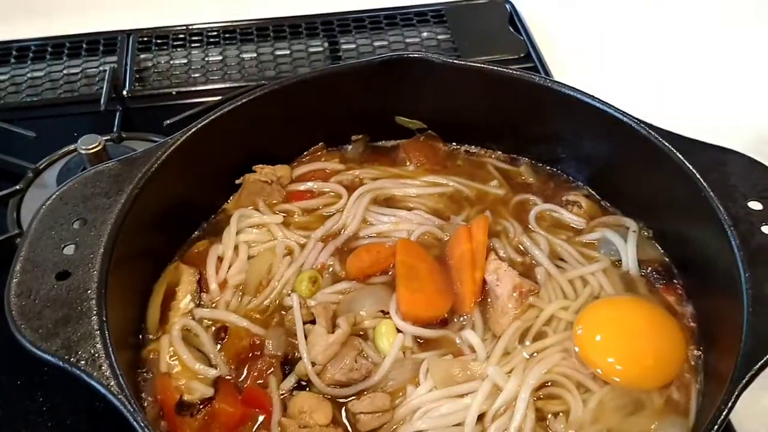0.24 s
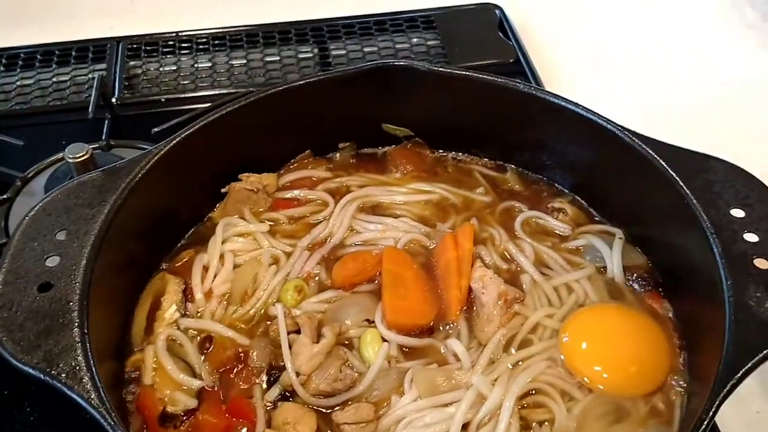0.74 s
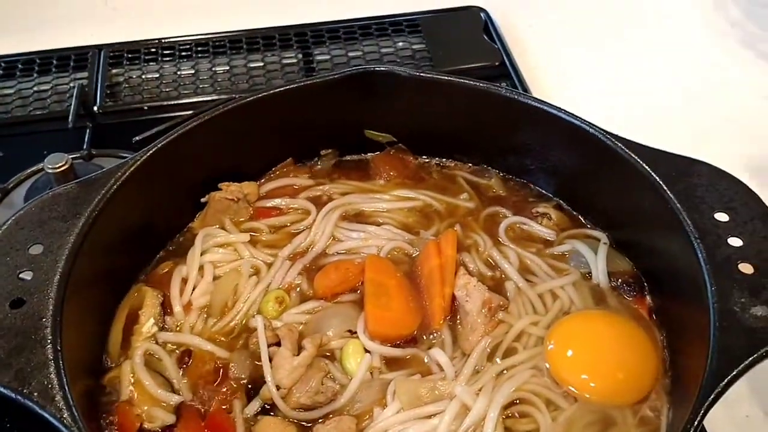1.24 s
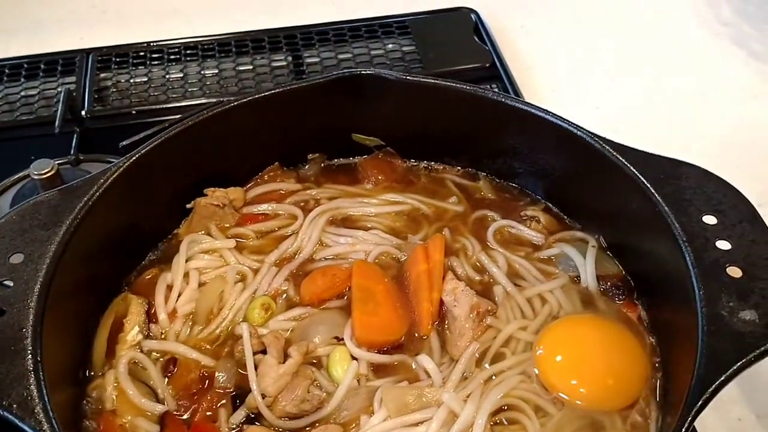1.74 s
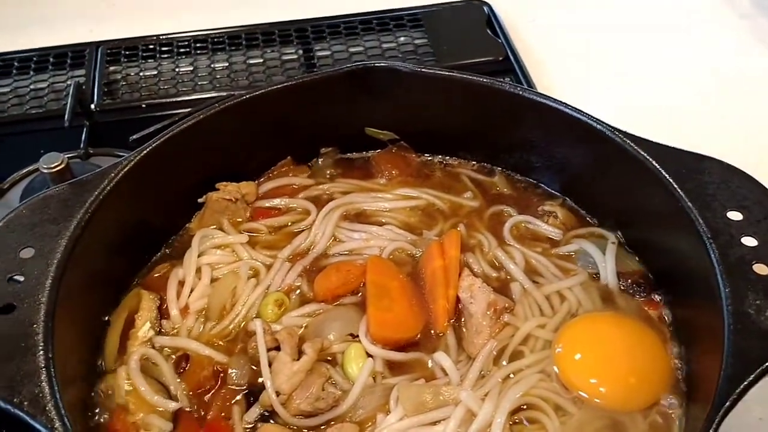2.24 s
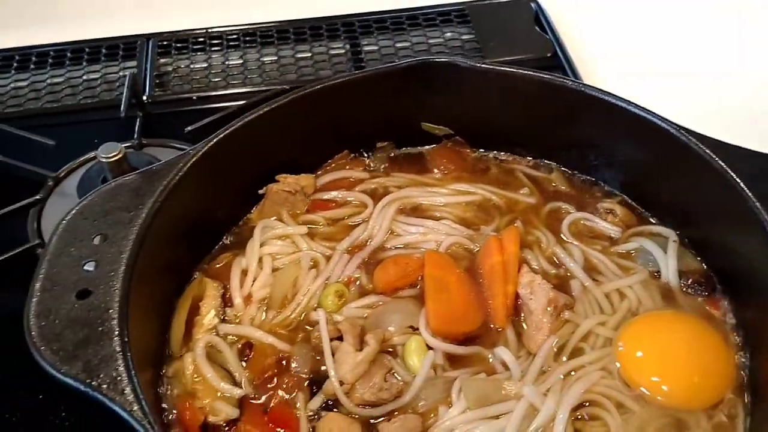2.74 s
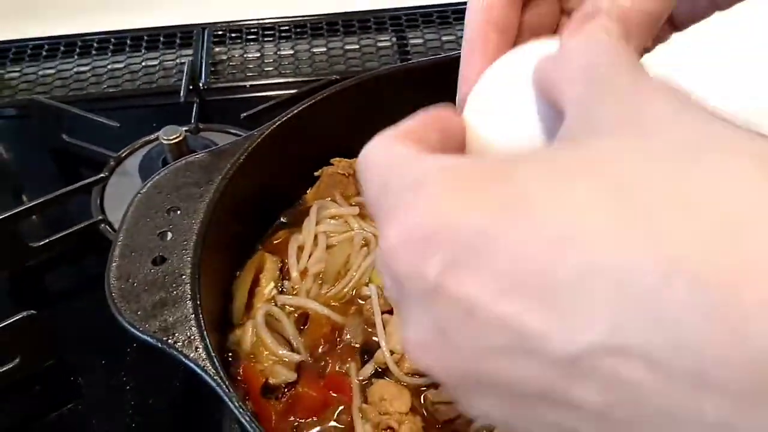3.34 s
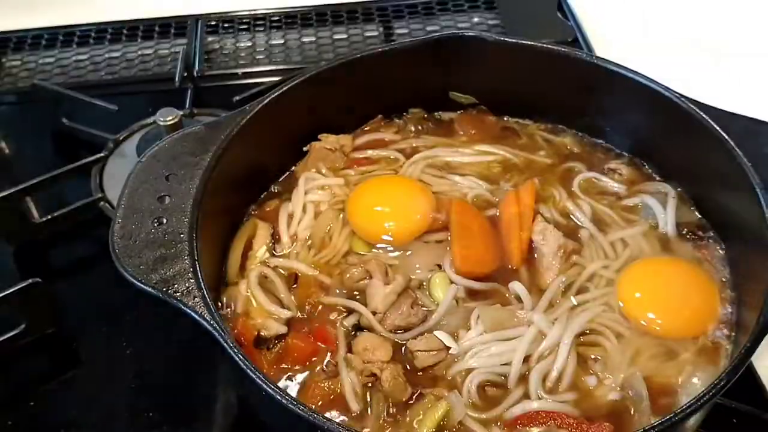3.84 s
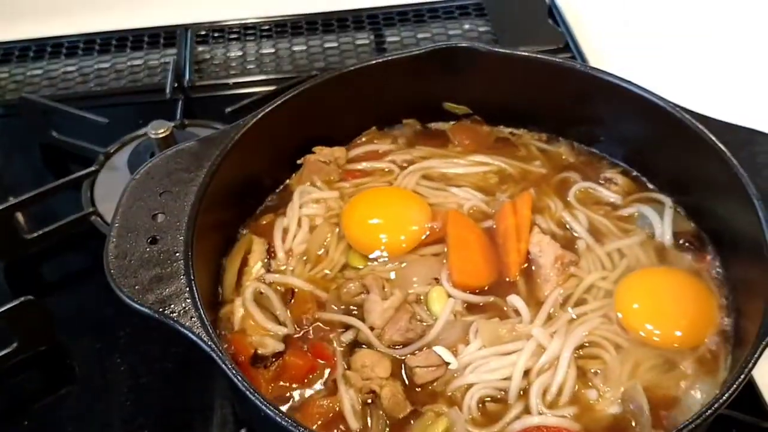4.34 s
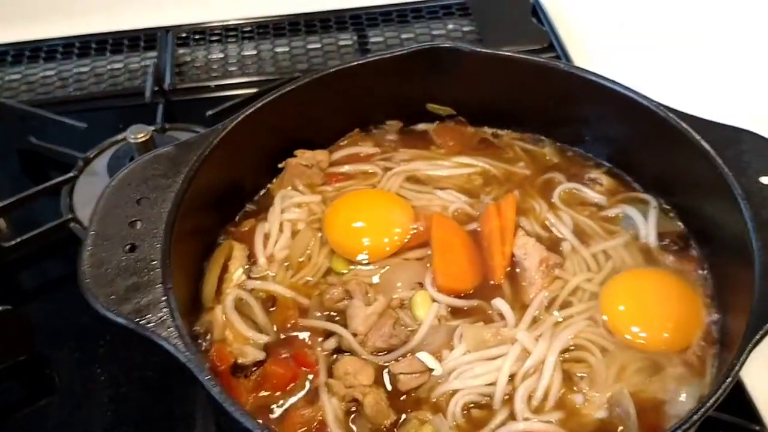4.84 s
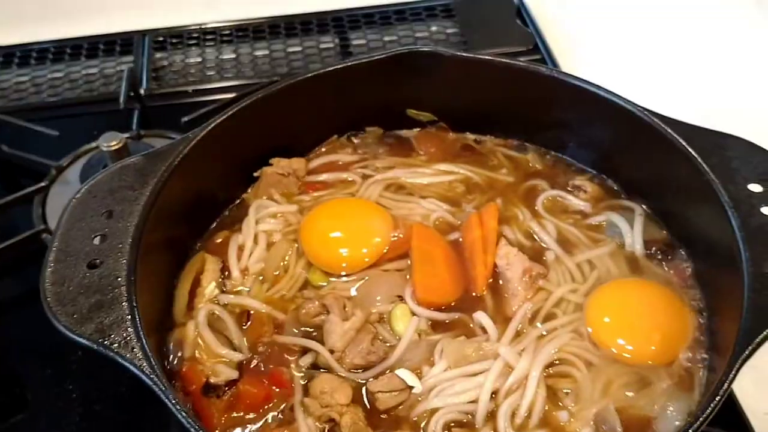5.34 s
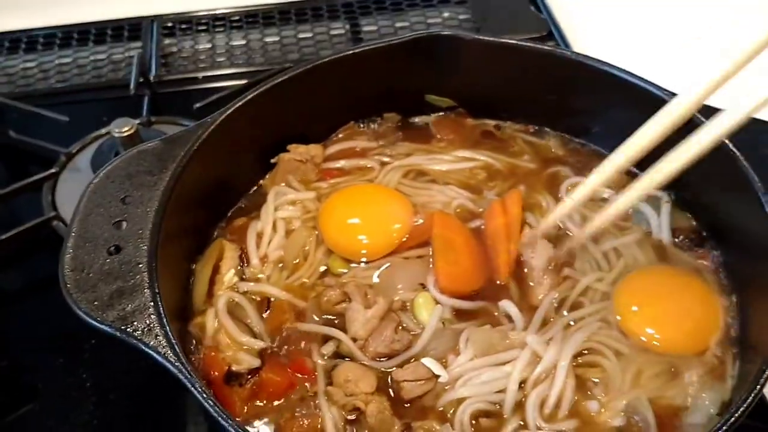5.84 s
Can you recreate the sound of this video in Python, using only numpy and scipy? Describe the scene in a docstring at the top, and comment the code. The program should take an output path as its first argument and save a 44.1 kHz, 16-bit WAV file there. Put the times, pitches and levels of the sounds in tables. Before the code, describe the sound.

Soft bubbling and fine fizzing of a hot pot, with an egg's sharp rap and crunch between two clinks of shell dropped in a bowl.

```python
"""Throughout, noodle broth simmers in an iron pot on a gas burner: decaying sines that rise in pitch
for the bubbles, tiny high ticks for the fizz, coloured noise for the rush of the boil.
At 0.7 s eggshells drop into a china bowl: coloured clicks and noise bursts over decaying bowl modes.
At 1.4 and 1.7 s an egg is knocked on the counter and cracks: knock, thud and crunch noise bursts.
At 4.4 s its shell lands in the bowl too. A small kitchen adds its noise-tail reverberation."""
import sys
import numpy as np
from scipy import signal
from scipy.fft import rfft, irfft, next_fast_len
from scipy.io import wavfile

SR = 44100
rng = np.random.default_rng(int(sys.argv[2]) if len(sys.argv) > 2 else 0)


def inscribe(sig):
    """Save sig as 16-bit PCM at rate SR to the path in sys.argv[1].

    A 1-D sig is mono; a 2-D sig holds one channel per row.
    Samples are clipped to [-1, 1] before scaling.
    """
    pcm = np.round(np.clip(np.atleast_2d(sig).T, -1, 1) * 32767)
    wavfile.write(sys.argv[1], SR, pcm.astype(np.int16))


N = 269010

# Drives are amplitudes ahead of group gain, colour and room; pitches are at the onset of the glide.
# Large bubbles: (time [s], drive [dB], pitch [Hz])
LARGE_POPS = [(0.5102, -38.5, 2080), (1.1947, -38, 1510), (1.6462, -38.5, 2160), (2.3111, -46, 2080),
              (2.588, -32.5, 1980), (2.9399, -40.5, 1560), (3.8671, -41, 1210), (4.3186, -37.5, 1540),
              (4.6733, -34.5, 1300), (4.9721, -36, 1620), (5.2016, -41, 1860), (5.252, -37, 1380),
              (5.6136, -40, 1910), (6.0671, -35.5, 1580)]
# Droplets spitting on the hot wall: (time [s], drive [dB], pitch [Hz])
WALL_SPITS = [(0.3364, -34, 13600), (2.2805, -38, 6260), (2.373, -38, 4770), (4.6294, -34.5, 4650)]
# Steam gulping under the noodles: (time [s], drive [dB], pitch [Hz])
STEAM_GULPS = [(1.055, -40.5, 390), (1.08, -39.5, 498)]
# Stray pops and spits: (rate [1/s], drive [dB], drive spread [+-dB], pitch [Hz], half of pitch spread [+-octaves])
STRAY_POP_STATS = (3.5, -43.5, 1.5, 1607, 0.43)
STRAY_SPIT_STATS = (1, -43, 9, 8000, .5)
# Shell landings: (time [s], first contact level [dB], tilt above 1 kHz [dB/octave], hollow [Hz],
# first bounce gap [s], ring drive [dB], place [0 bottom - 1 rim], contact left minus right [dB])
SHELL_LANDINGS = [(0.737, -28, 6, 1280, .005, -37.5, 0.2, -11), (0.7416, -30, 2, 1720, 0.0019, -46, .3, 2),
                  (0.7835, -30.5, -2, 1156, .0058, -40, 0.2, -3.5),
                  (4.3664, -22.5, 2.5, 840, .0114, -25, 1, 3.5), (4.393, -26, 0, 1020, .028, -46, 0.61, 13)]
# Egg contacts: (time [s], knock level [dB], thud drive [dB], crunch level [dB], knock left minus right [dB])
EGG_KNOCKS = [(1.4425, -23.5, -36, -42, 16), (1.4445, -17, -33.5, -30, 13.5), (1.6986, -45, -42, -26, -1),
              (1.7018, -32, -27, -29, 6.5)]
# China bowl modes: (frequency [Hz], t60 [s], gain struck at bottom [dB], gain struck at rim [dB])
BOWL_MODES = [(1096, 0.16, 10, -17), (1210, 0.31, 5.5, -29), (1250, 0.13, 7, -3), (1790, 0.17, -1, -26),
              (2714, .52, -5, -8.5), (2742, .4, -12, -22), (2820, .12, -13, -29), (3472, .1, -30, -27),
              (3820, 0.13, -26, -12), (4480, 0.49, -29, -24), (4737, 0.34, -36, -10), (6170, 0.065, 8, -21),
              (6664, 0.15, -25, -4), (7300, 0.075, -26, -3), (8900, .1, -9, -39)]
# Resonances of the air above the broth: (frequency [Hz], width [Hz], lift or dip [dB])
POT_AIR_MODES = [(300, 5.8, 5), (349.3, 5.8, 6.5), (610, 41, 5.5), (489, 29, 0.5), (715.6, 82, 9.5),
                 (766, 17.5, 5.5), (837, 34, 4.5), (1004, 5.6, -3), (1220, 41, 2)]
# Relative noise and tick spectra: (frequency [Hz], gain [dB])
SHELL_COLOUR = [(60, -37), (200, -33), (330, -18), (600, -14.5), (1000, -7), (1450, -5.5), (1750, -5.5),
                (2250, -11.5), (2800, -3), (3700, -10.5), (5500, -12.5), (9000, -16), (15000, -20.5)]
COUNTER_COLOUR = [(50, -29), (150, -40), (290, -3.5), (450, -5), (620, 0.5), (840, 1.5), (1100, -6),
                  (1600, -7.5), (2100, -0.5), (2700, -0.5), (3400, -8), (6000, -12.5), (10000, -21.5),
                  (16000, -23)]
THUD_COLOUR = [(40, -27), (100, -31), (150, -3), (195, -8), (310, 5.5), (550, 4), (800, -2.5), (1200, -6.5),
               (4000, -22), (16000, -41)]
CRUNCH_COLOUR = [(150, -20.5), (1100, -22), (1600, 2.5), (2500, -3), (3500, -4.5), (6000, -10), (9500, -7),
                 (12000, -11), (16000, -11)]
BOIL_COLOUR = [(25, -47), (60, -26), (100, -20.5), (155, -11.5), (255, -17.5), (335, -4.5), (520, -4),
               (720, -7), (950, -7.5), (2000, -13), (3400, -17), (6000, -19.5), (8500, -25.5),
               (11500, -22.5), (15500, -39)]
FIZZ_COLOUR = [(300, -19), (1500, 6), (3000, -6.5), (5000, -3.5), (9000, 1.5), (11500, 0), (15500, 3.5)]
# Responses of pot mouth, hot wall and the two microphones: (frequency [Hz], gain [dB])
POT_MOUTH_RESPONSE = [(40, -55), (150, -23), (260, -13), (350, 3), (700, 0), (2400, 4.5), (4000, 1),
                      (15000, -29)]
WALL_RESPONSE = [(60, -40), (800, -18), (2500, 3.5), (16000, 2.5)]
LEFT_MIC_RESPONSE = [(7000, 0), (9500, 1.5), (11000, -2.5), (16000, -0.5)]
RIGHT_MIC_RESPONSE = [(6000, 0.41), (8500, 1.6), (11000, 0.67), (15000, 2.7)]
# Kitchen reverberation: (frequency [Hz], t60 [s])
KITCHEN_T60 = [(130, 0.71), (350, 0.35), (1000, 0.44), (3000, 0.32), (7000, 0.4), (15000, 0.26)]

# Each bounce comes sooner, weaker and duller than the contact before it.
BOUNCE_GAP_RATIO, BOUNCE_LOSS_DB, BOUNCE_TILT_DB_PER_OCT = 0.76, -6, -1.5
MIC_GAP_S = 0.000341  # sound travel time between the microphones
TOP_HZ = 16000
T = np.arange(SR // 2) / SR  # time axis of a blow [s]


def simmer(cluster_rate_hz=120, pitch_hz=1500, octaves=0.55, cycles=8, crowd_db=-59.0):
    """Bubbles burst in clusters; large pops set off neighbours; steam gulps; the pot's air colours all."""
    crowd, large = np.zeros((2, N)), np.zeros((2, N))
    large_cycles, pop_gain_db, neighbour_db, cluster_s = 10, 3.5, -9, 0.014

    for s, db, hz in list(LARGE_POPS) + strays(*STRAY_POP_STATS):
        pan_db = 2.0 + 2 * rng.standard_normal()
        add(large, s, undb(db + pop_gain_db) * bubble(hz, large_cycles, pan_db))
        for delay, shift in rng.random((4, 2)):
            neighbour = bubble(hz * 2 ** (1.3 * shift - 0.5), large_cycles, pan_db)
            add(large, s + cluster_s * delay ** 2, undb(db + neighbour_db) * neighbour)

    for s, db, hz in STEAM_GULPS:
        add(large, s, undb(db) * bubble(hz, large_cycles, pan_db=2.1))

    for s in rng.uniform(0, N / SR, int(cluster_rate_hz * N / SR)):
        force, place = rng.uniform(-1.12, 1, 2)
        for size in np.clip(rng.standard_normal(3), -2, 2):
            small = bubble(pitch_hz * 2 ** (octaves * size), cycles, 6 * place)
            add(crowd, s + cluster_s * rng.random(), undb(4.2 * force) * small)

    bursts = kitchen(level(crowd, crowd_db), wet_db=-2.5) + kitchen(large, wet_db=-4)
    return colour(bursts, POT_MOUTH_RESPONSE, peaks=POT_AIR_MODES)


def fizz(tick_rate_hz=560, spread_db=5, sizzle_db=-59.0, cycles=8, echo_db=-4, echo_max_s=0.0035):
    """Tiny bubbles snap on the hot wall, each echoed by the far side of the pot; droplets spit in bursts."""
    ticks, spits = np.zeros((2, N)), np.zeros((2, N))
    spit_pan_db, spit_burst_s = -2, 0.005

    for s, db, hz in list(WALL_SPITS) + strays(*STRAY_SPIT_STATS):
        add(spits, s, undb(db) * bubble(hz, cycles, spit_pan_db, size=256))
        for delay, shift in rng.random((8, 2)):
            droplet_hz = min(hz * 2 ** (2.0 * shift - 0.7), 14000)
            droplet = bubble(droplet_hz, cycles, spit_pan_db, size=256)
            add(spits, s + spit_burst_s * delay, undb(db - 2) * droplet)

    for when, pitch, force, place, path in rng.random((int(tick_rate_hz * N / SR), 5)):
        s = when * N / SR
        # most ticks are faint, a few are sharp
        tick_gain = undb(-spread_db * np.log(0.0087 + force))
        tick = tick_gain * bubble(2800 + 12500 * pitch, cycles, 14 * (place - 0.5), size=256)
        add(ticks, s, tick)
        add(ticks, s + echo_max_s * path, undb(echo_db) * tick[::-1])  # echo swaps sides

    flicker = undb(1.25 * walk(30))
    sizzle = level(colour(ticks, FIZZ_COLOUR) * flicker, sizzle_db)
    return kitchen(sizzle + colour(spits, WALL_RESPONSE), wet_db=-3.0)


def shells(shell_t60_s=0.055, hollow_width_hz=220, hollow_lift_db=9, contacts=3):
    """Hollow shell halves land and bounce; the landing sets the bowl's modes ringing."""
    clacks, rings = np.zeros((2, N)), np.zeros((2, N))
    for s, db, tilt_db, hollow_hz, gap_s, ring_db, place, pan_db in SHELL_LANDINGS:
        touch_s = s
        hollow = [(hollow_hz, hollow_width_hz, hollow_lift_db)]
        for k in range(contacts):
            raw = contact(shell_t60_s, grain_db=6.5)
            clack = colour(raw, SHELL_COLOUR, tilt_db + k * BOUNCE_TILT_DB_PER_OCT, hollow)
            add(clacks, touch_s, blow_level(clack, db + k * BOUNCE_LOSS_DB) * sides(pan_db))
            touch_s += gap_s * BOUNCE_GAP_RATIO ** k
        for hz, t60_s, bottom_db, rim_db in BOWL_MODES:
            # each mode reaches the two microphones at its own phase
            phase = rng.uniform(0, 2 * np.pi) + rng.uniform(-0.9, 0.9, (2, 1))
            # a harder contact feeds the higher modes
            hardness_db = tilt_db * np.log2(hz / 2700)
            place_db = np.interp(place, [0, 1], [bottom_db, rim_db])
            mode = fade(t60_s) * np.sin(2 * np.pi * hz * T + phase)
            add(rings, s, undb(ring_db + hardness_db + place_db) * mode * sides(pan_db / 2))
    return kitchen(clacks, wet_db=-5.5) + kitchen(rings, wet_db=-14.0)


def egg(knock_t60_s=0.051, thud_t60_s=0.034, crunch_t60_s=0.033):
    """The egg raps the counter; its shell crunches as it gives way and the counter booms softly."""
    raps, booms = np.zeros((2, N)), np.zeros((2, N))
    for s, knock_db, thud_db, crunch_db, pan_db in EGG_KNOCKS:
        knock = colour(contact(knock_t60_s, grain_db=7.0), COUNTER_COLOUR)
        crunch = colour(contact(crunch_t60_s, grain_db=0.5), CRUNCH_COLOUR)
        thud = colour(contact(thud_t60_s, grain_db=2.5), THUD_COLOUR)
        add(raps, s, blow_level(knock, knock_db) * sides(pan_db))
        add(raps, s, blow_level(crunch, crunch_db) * sides(pan_db + 0.5))
        add(booms, s, blow_level(thud, thud_db - 1.5) * sides(pan_db))
    return kitchen(raps, wet_db=-7.5) + kitchen(booms, wet_db=-3.0, build_s=0.0027)


def boil(rush_db=-55):
    """Flame and boiling at the bottom merge into a rush that rings the air in the pot."""
    rush = colour(diffuse(N), BOIL_COLOUR, peaks=POT_AIR_MODES)
    unrest_db = 0.096 * walk(4.7) + 0.52 * walk(23)
    return level(rush, rush_db) * undb(unrest_db) * sides(2.3)


def kitchen(x, wet_db, build_s=0.0006):
    """Add the room: a dense diffuse tail, quick to build up, with its own decay time per frequency."""
    hz, s, cells = signal.stft(diffuse(len(T)), SR, nperseg=256)
    cells = cells * undb(-60 * s / lookup(KITCHEN_T60, hz)[:, None])
    tail = signal.istft(cells, SR)[1][:, :len(T)] * (1 - np.exp(-T / build_s))
    tail = tail / np.sqrt(np.mean(np.sum(tail ** 2, axis=1)))
    return x + undb(wet_db) * signal.fftconvolve(x, tail, axes=1)[:, :N]


def bubble(hz, cycles, pan_db, glide=0.22, size=2048):
    """A bubble rings a few cycles, rising in pitch; its place delays one microphone."""
    lag_s = rng.uniform(-1.062, 0.64) * MIC_GAP_S
    t = np.maximum(T[:size] - np.array([[max(lag_s, 0)], [max(-lag_s, 0)]]), 0)
    age = t * hz / cycles  # 1 at -60 dB
    phase = 2 * np.pi * hz * t * (1 + glide * np.minimum(age, 1))
    return sides(pan_db) * np.sin(phase) * np.exp(-np.log(1000) * age)


def contact(t60_s, grain_db, lag_s=0.00031):
    """A sharp click from one side, with a dying rush of tiny fractures and near reflections."""
    grain_gain = undb(grain_db * np.repeat(rng.standard_normal(len(T)), 16)[:len(T)])
    rush = blow_level(diffuse(len(T)) * grain_gain * fade(t60_s), 0)
    click = np.sinc((T - np.array([[lag_s], [0]])) * SR)
    return rush + blow_level(click, -9.5)


def strays(rate_hz, db, spread_db, hz, octaves):
    """One burst per interval at a random moment, strength and pitch: rows of (time [s], dB, Hz)."""
    when, force, size = rng.random((64, 3)).T
    s = (np.arange(len(when)) + when) / rate_hz
    drive_db = db + spread_db * (2 * force - 1)
    pitch_hz = np.minimum(hz * 2 ** (octaves * (4 * size - 2)), TOP_HZ)
    rows = np.transpose([s, drive_db, pitch_hz])
    return list(rows[s < N / SR])


def diffuse(count):
    """Noise from all around: alike at both microphones in the bass, unrelated in the treble."""
    size = next_fast_len(count, True)
    mid, side = rfft(rng.standard_normal((2, size)))
    hz = np.arange(len(mid)) * SR / size
    alike = np.clip(0.94 * np.exp(-(2 * hz * MIC_GAP_S) ** 2 * 2), 0, 1)
    mid, side = mid * np.sqrt(1 + alike), side * np.sqrt(1 - alike)
    return irfft(np.array([mid + side, mid - side]), size)[:, :count] / np.sqrt(2)


def walk(rate_hz):
    """Random level joined by straight lines between normal knots."""
    knots = rng.standard_normal(400)
    return np.interp(np.arange(N) / SR * rate_hz, np.arange(len(knots)), knots)


def fade(t60_s):
    """Exponential decay by 60 dB in t60_s."""
    return undb(-60 * T / max(t60_s, 1e-4))


def colour(x, points, tilt_db=0, peaks=(), size=8192):
    """Minimum-phase filter: smooth spectrum, tilt per octave above 1 kHz, narrow resonances."""
    hz = np.arange(size // 2 + 1) * SR / size
    db = lookup(points, hz) + tilt_db * np.log2(np.maximum(hz, 1000) / 1000)
    for f, width_hz, lift_db in peaks:
        db = db + lift_db / (1 + (2 * (hz - f) / width_hz) ** 2)
    # folding the cepstrum makes the filter causal
    cepstrum = irfft(np.log(undb(db)))[:size // 2]
    cepstrum[1:] *= 2
    response = irfft(np.exp(rfft(cepstrum, size)))[:size // 2]
    return signal.fftconvolve(x, response[None], axes=1)[:, :x.shape[1]]


def lookup(points, hz):
    """Read a table on a log-frequency axis."""
    f, value = np.transpose(points)
    return np.interp(np.log(np.maximum(hz, 1)), np.log(f), value)


def undb(db):
    """Amplitude ratio of a level in dB."""
    return 10 ** (np.asarray(db) / 20)


def level(x, db):
    """Scale to an RMS level."""
    return x * undb(db) / np.sqrt(np.mean(x ** 2))


def blow_level(x, db):
    """Scale a short sound to the energy of 10 ms at this level."""
    return x * undb(db) / np.sqrt(np.mean(np.sum(x ** 2, axis=-1)) / (SR / 100))


def sides(pan_db):
    """Left and right gains of constant total power, pan_db apart."""
    g = undb(np.array([[pan_db], [-pan_db]]) / 2)
    return g / np.sqrt(np.mean(g ** 2))


def add(out, s, x):
    """Mix a sound in from time s."""
    i = int(s * SR)
    out[:, i:i + x.shape[1]] += x[:, :max(N - i, 0)]


def scene():
    """Sum of all sources."""
    return simmer() + fizz() + shells() + egg() + boil()


def record(dry):
    """Two microphones, the right one brighter, then a steep low-pass at TOP_HZ."""
    left = colour(dry[:1], LEFT_MIC_RESPONSE)
    right = colour(dry[1:], RIGHT_MIC_RESPONSE)
    low_pass = signal.ellip(10, 0.2, 70, TOP_HZ, fs=SR, output="sos")
    return signal.sosfilt(low_pass, np.vstack([left, right]))


dry = scene()
out = record(dry)
inscribe(out)
```